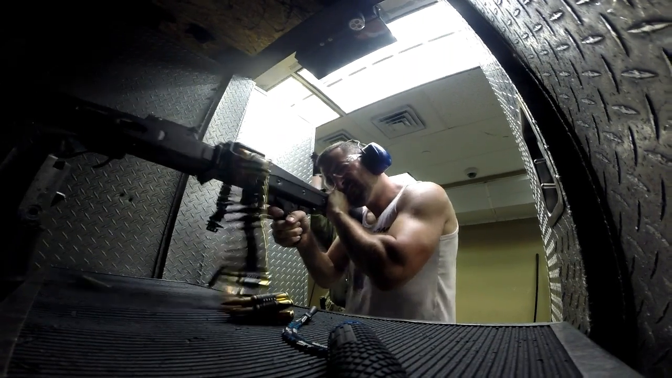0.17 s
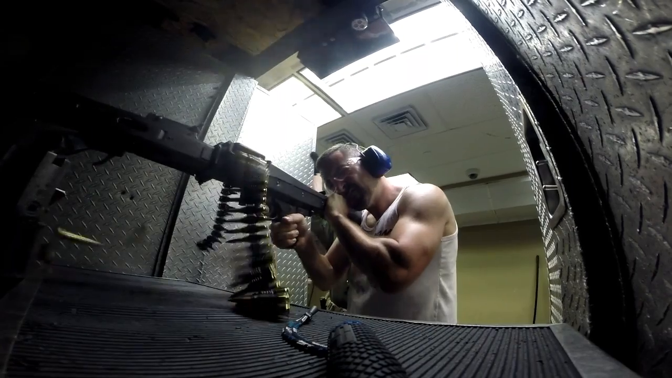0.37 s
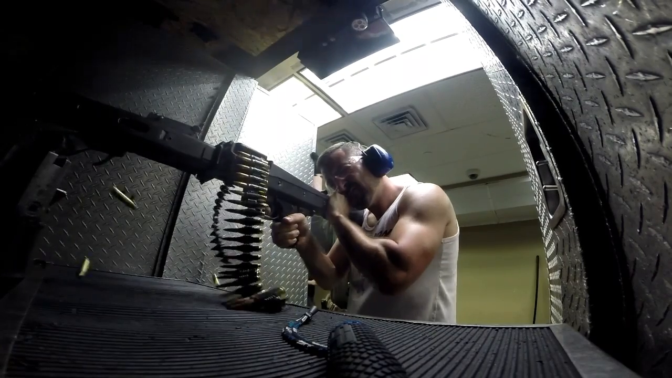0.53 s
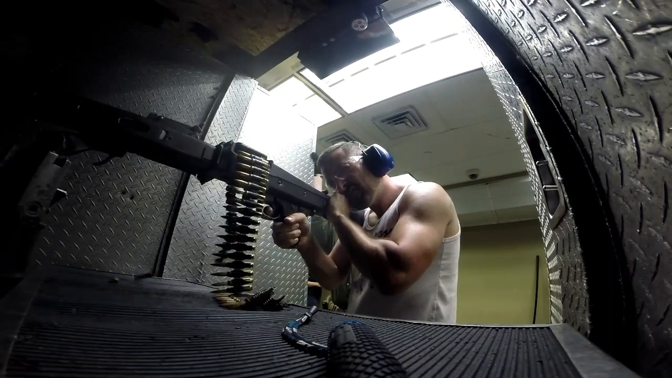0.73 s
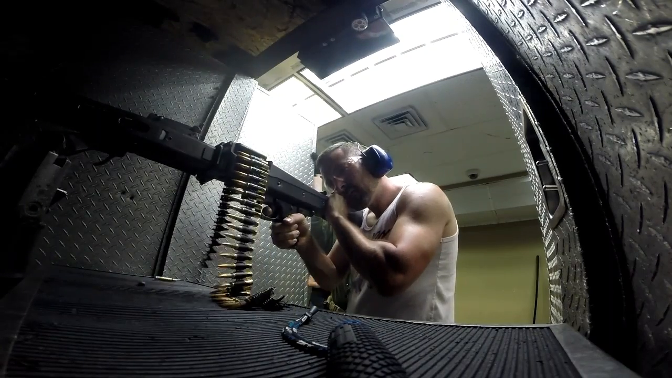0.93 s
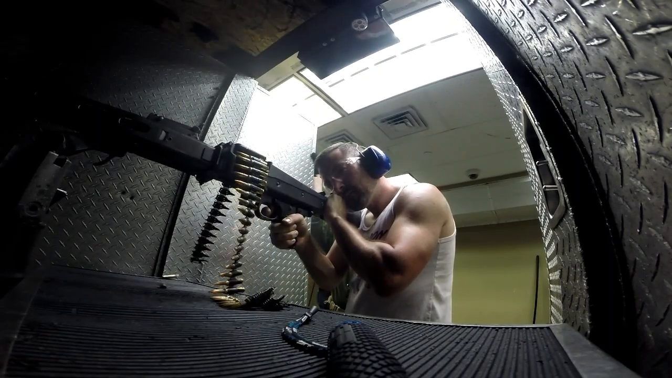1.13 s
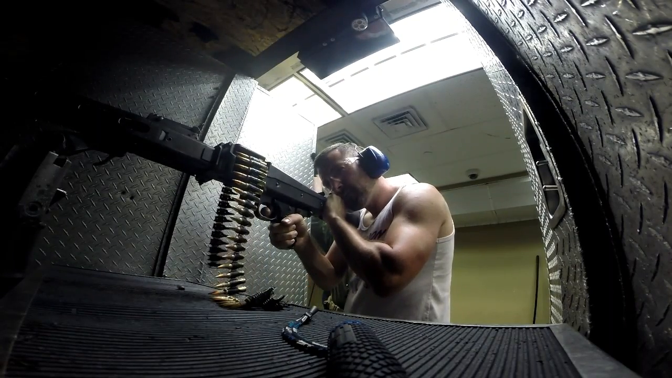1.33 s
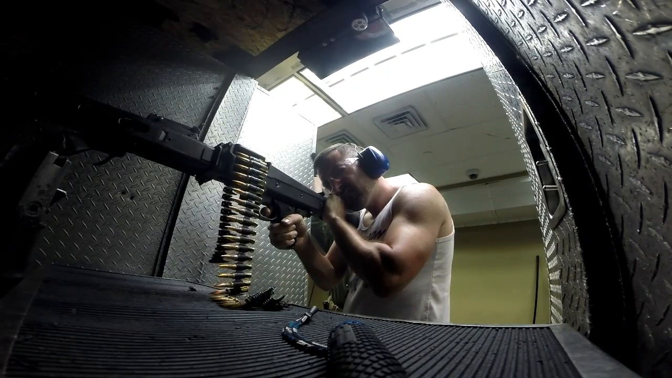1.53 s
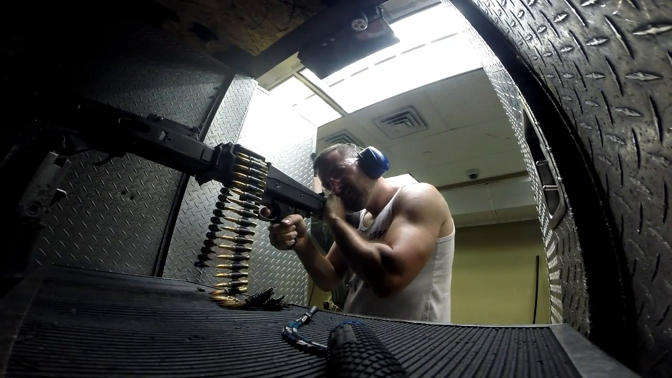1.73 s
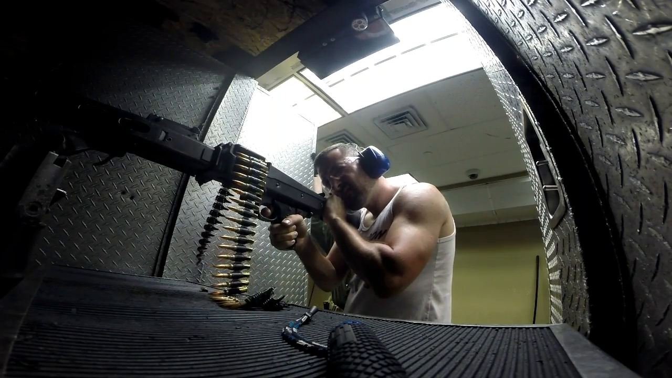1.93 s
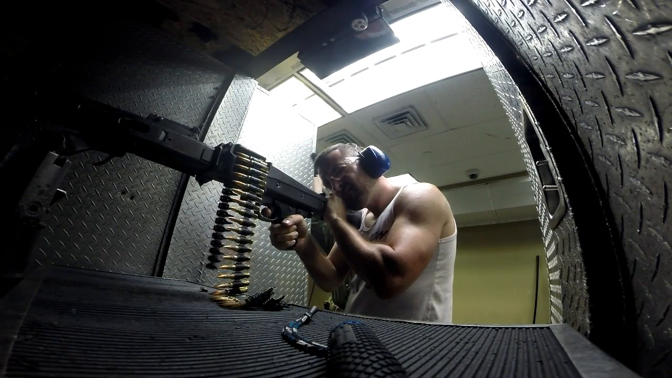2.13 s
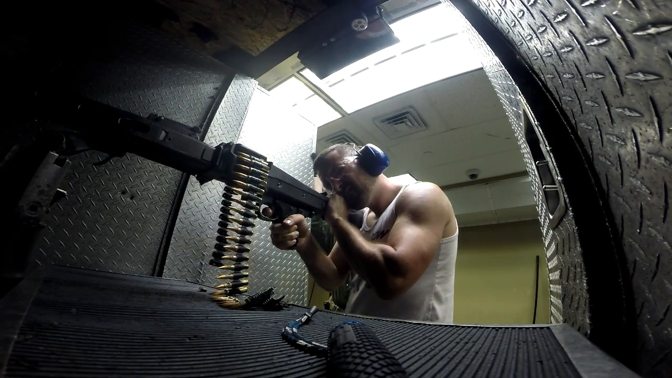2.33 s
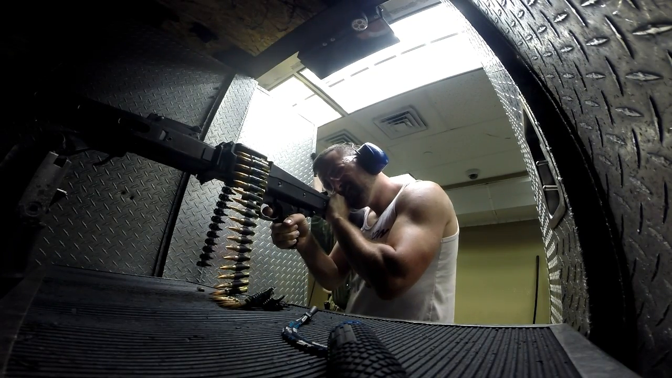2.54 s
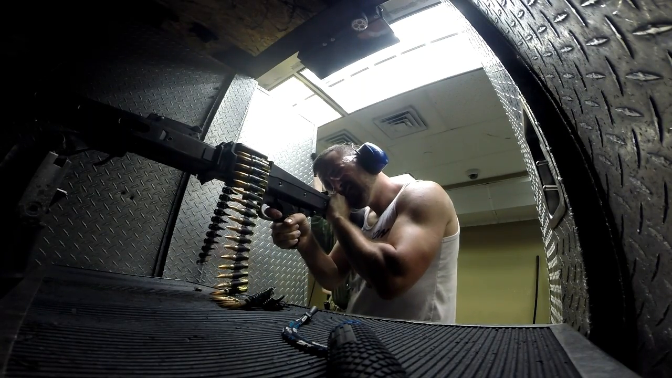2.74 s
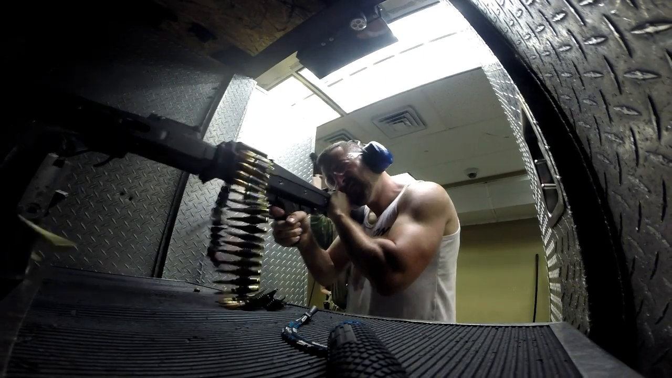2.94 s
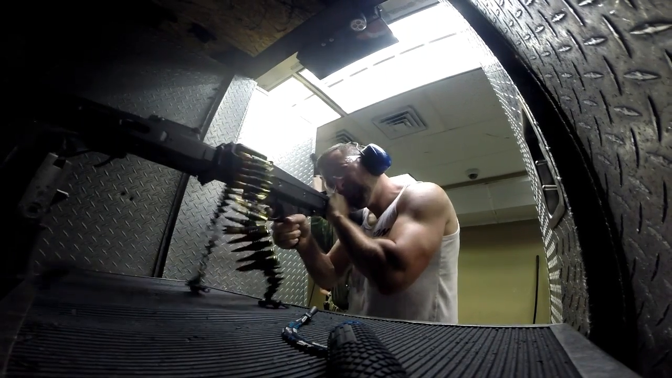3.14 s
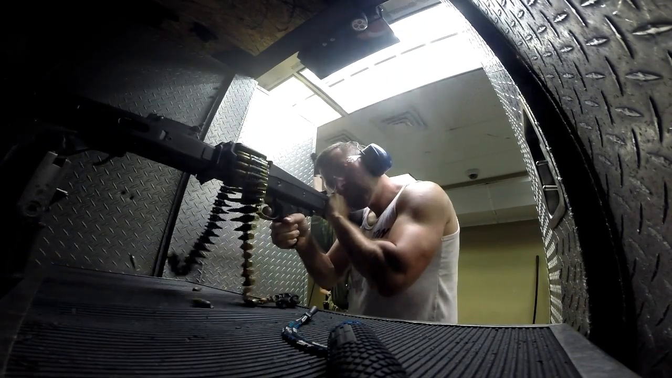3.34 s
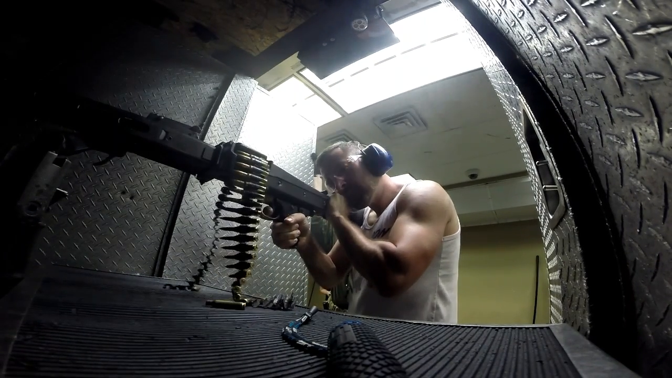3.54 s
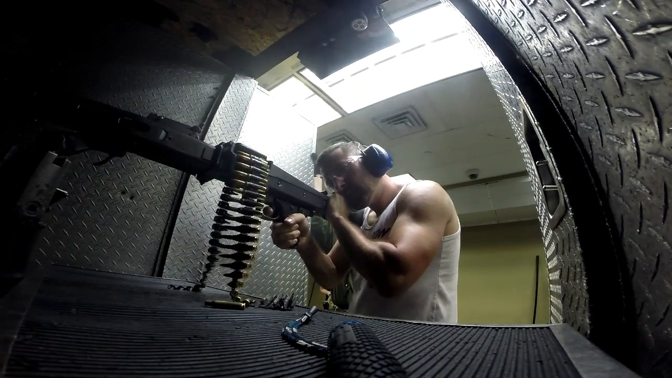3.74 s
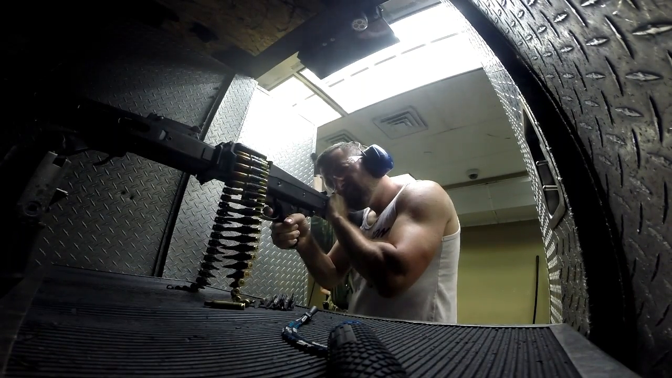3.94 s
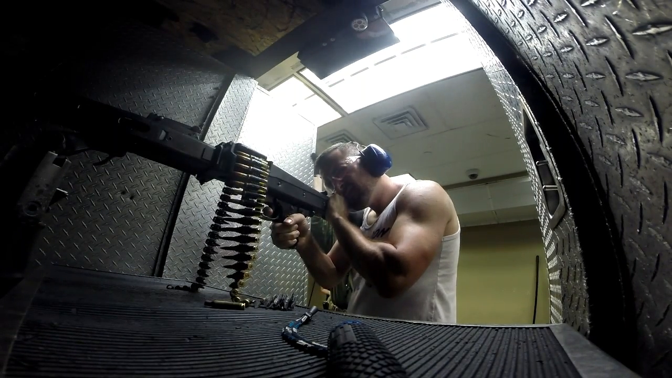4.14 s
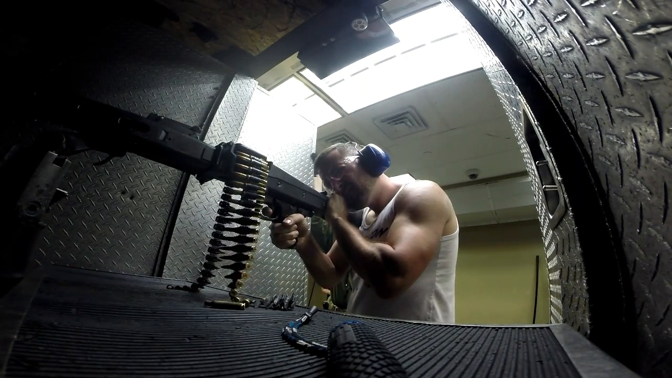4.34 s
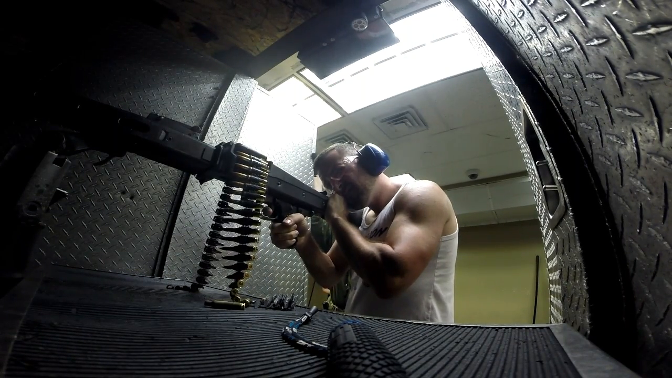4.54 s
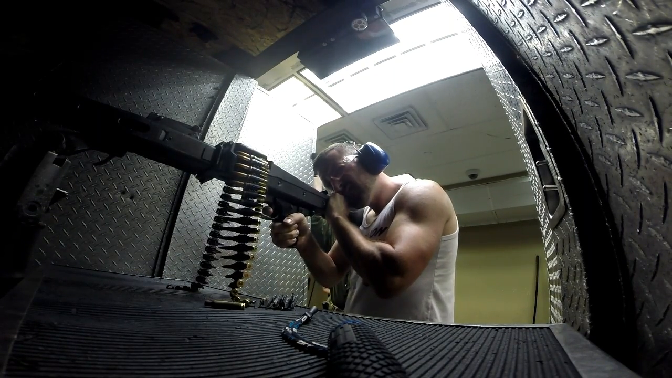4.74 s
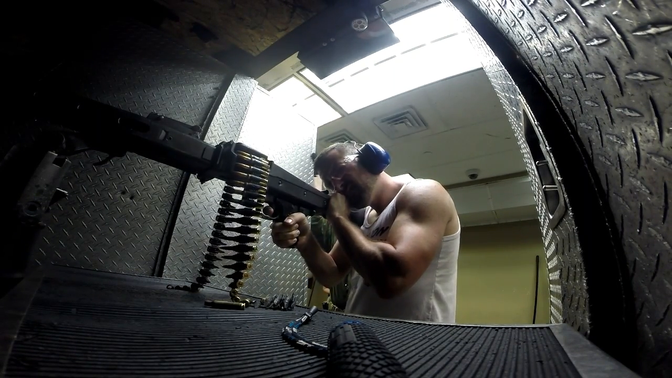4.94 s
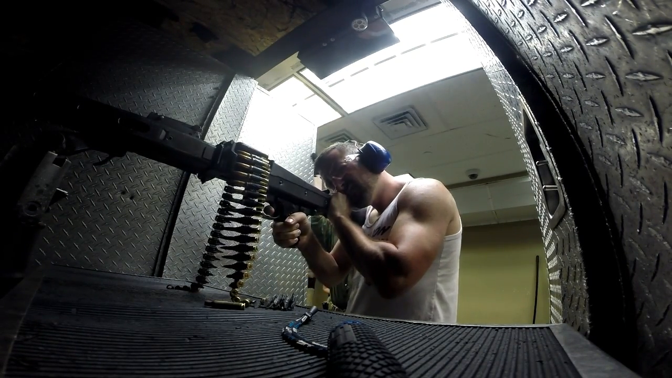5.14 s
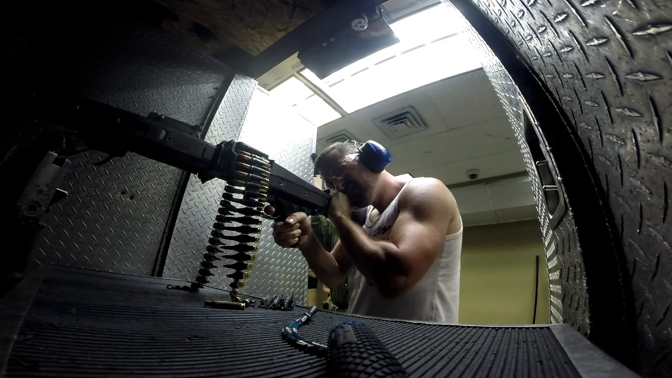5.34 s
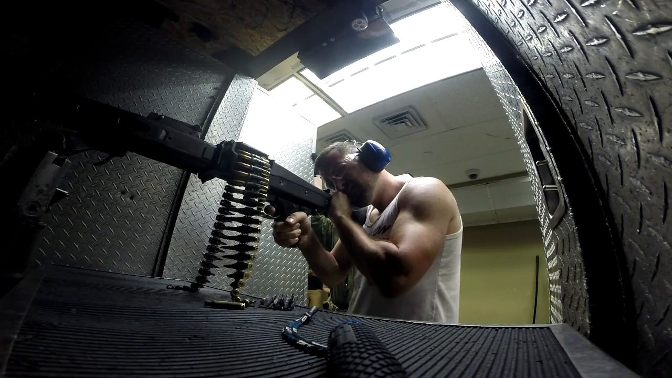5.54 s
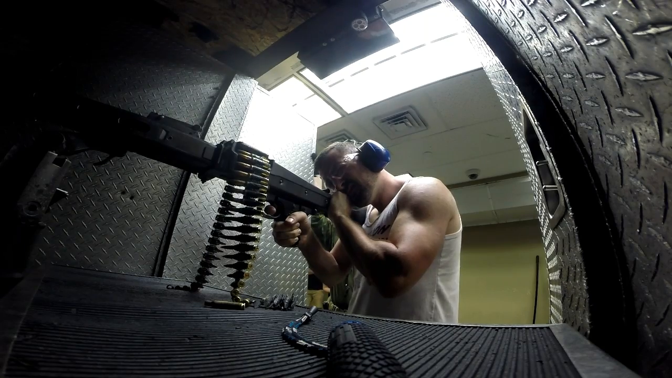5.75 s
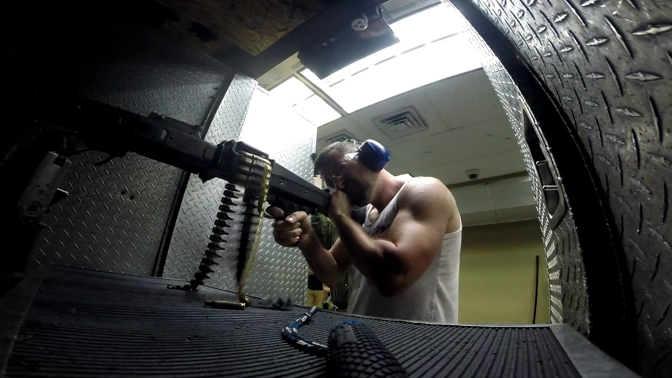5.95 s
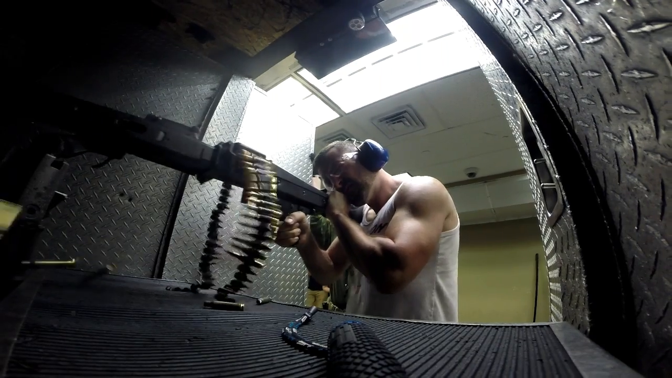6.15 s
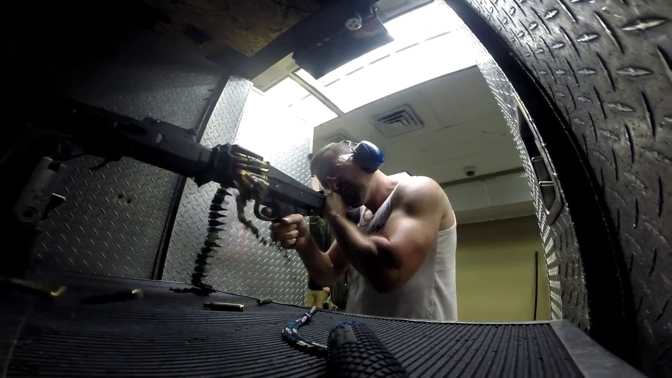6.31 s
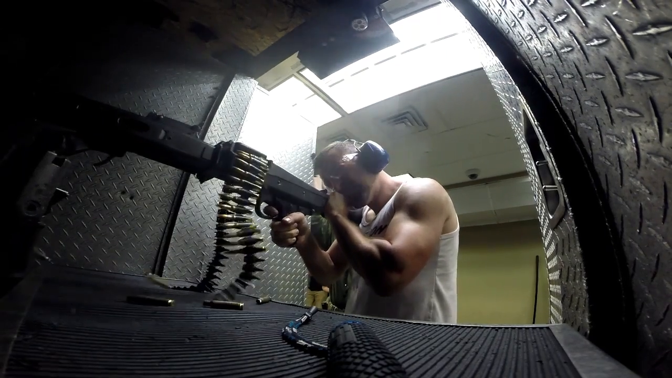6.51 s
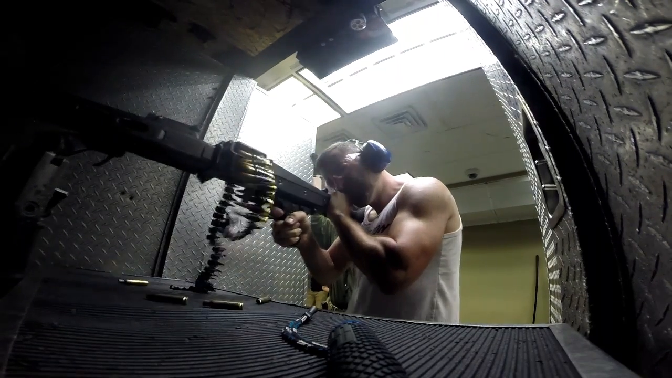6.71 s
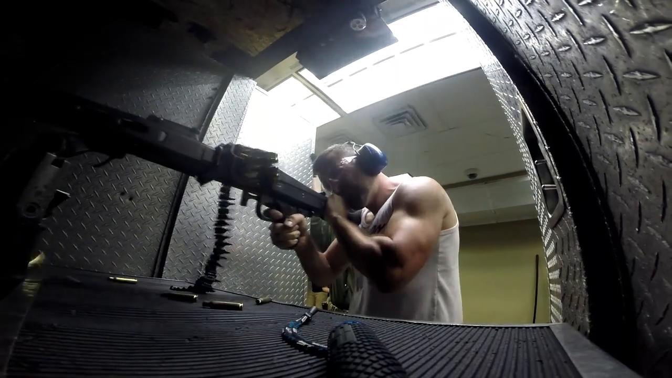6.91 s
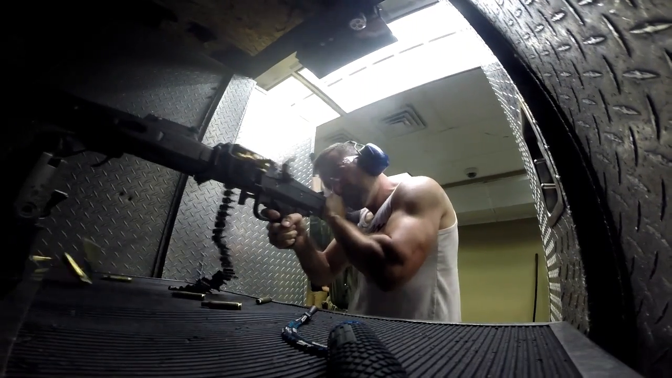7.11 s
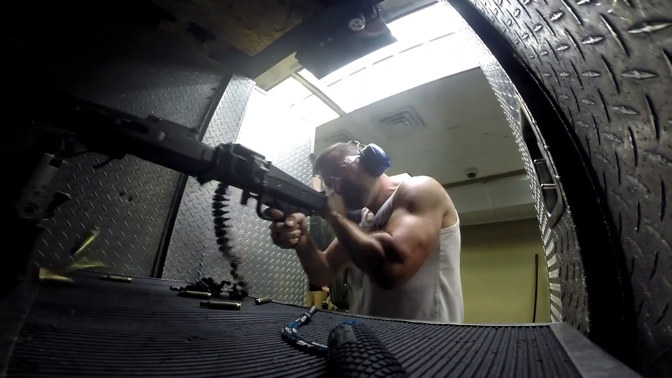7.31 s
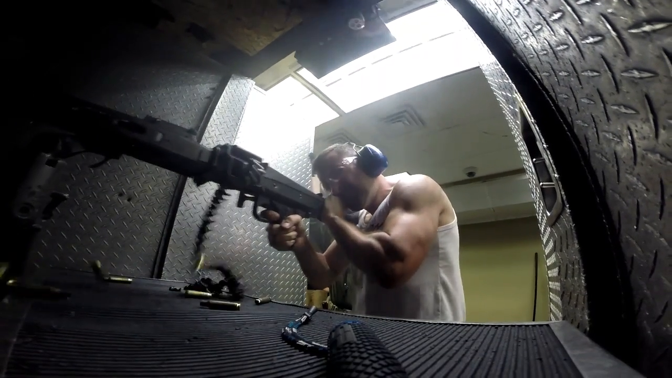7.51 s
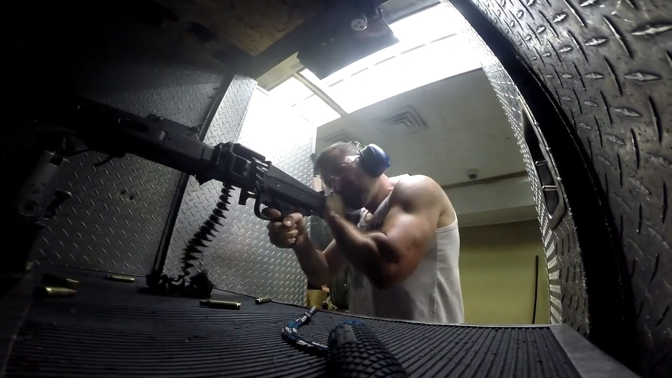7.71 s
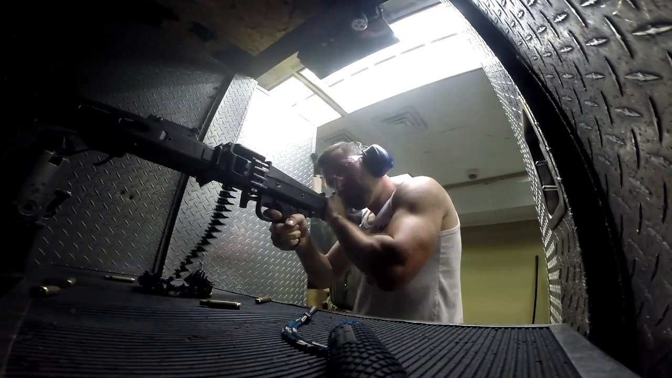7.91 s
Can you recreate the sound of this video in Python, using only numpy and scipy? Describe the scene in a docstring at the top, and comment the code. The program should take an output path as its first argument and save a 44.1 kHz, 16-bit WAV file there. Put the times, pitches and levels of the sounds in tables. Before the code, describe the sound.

A belt-fed machine gun fires three short, very rapid bursts and one longer one in a steel-lined indoor range, each ringing into a booming roar.

```python
"""Machine gun in an indoor range

A belt-fed gun fires four bursts, about 16 rounds a second, as spiky noise coloured by a steel-lined booth.
Decaying noise gives the hall's roar, boom and singing wall plates, and one shot reflected from another lane.
The belt clanks, the bolt slams, spent cases ring as decaying sines, and the bench shudders over ventilation,
a low thump and drones.
The camera's gain control ducks on overload and climbs back steadily, so the roar hangs on before it fades."""
import sys
import numpy as np
from scipy import signal
from scipy.fft import rfft, irfft, next_fast_len
from scipy.io import wavfile
from scipy.ndimage import uniform_filter1d, map_coordinates

SR = 44100
rng = np.random.default_rng(int(sys.argv[2]) if len(sys.argv) > 2 else 0)


def dump(signal):
    """Clip the signal to [-1, 1] and save it as 16-bit WAV at the path in sys.argv[1]."""
    limited = np.clip(np.atleast_2d(signal).T, -1, 1)
    pcm = np.round(limited * 32767).astype(np.int16)
    wavfile.write(sys.argv[1], SR, pcm)


N = 355887

# All levels in dB are relative: the layers' gains and the camera's gain control act on them later.
# Trigger pulls. Each row: first round in seconds, last round in seconds, number of rounds,
# first blast in dB, bolt run in dB, bench shudder in dB.
TRIGGER_PULLS = [(.129, 0.4286, 6, 5.5, -16.5, -25), (2.9222, 3.2231, 6, 1, -18.5, -31),
                 (6.0876, 6.3934, 6, 4, -23, -25), (6.732, 7.6501, 16, 1, -33, -37)]
# Paths by which the shot in another lane arrives. Each row: arrival in seconds, level in dB.
LANE_ARRIVALS = [(5.2318, -12.5), (5.2375, -8.5), (5.249, -30), (5.259, -11)]
# Hard metal strikes: the belt on gun and bench, and two loud bolt slams (at 3.191 and 6.881 seconds).
# Each row: start in seconds, level in dB.
METAL_STRIKES = [(.562, -3.5), (.671, -7), (.75, -23), (.852, -20.5), (1.222, -15), (1.356, -27),
                 (1.443, -27.5), (1.63, -34.5), (2.099, -37.5), (3.191, -3), (3.29, -4), (3.763, -24.5),
                 (3.805, -27), (4.275, -38.5), (6.881, -7), (7.888, -11.5), (7.927, -8.5)]
# Jingles of the swinging belt. Each row: start in seconds, length in seconds, level of a clink in dB.
BELT_JINGLES = [(0.793, .32, -41.5), (1.236, .27, -31), (3.648, .24, -38.5), (7.901, .08, -26.5)]
# Falls of spent cases. Each row: first contact in seconds, level in dB, number of contacts,
# first flight in seconds, pitch that rings most in Hz.
CASE_FALLS = [(0, -49, 1, 0, 8800), (1.61, -39.5, 4, 0.11, 10500), (2.015, -45.5, 1, 0.0053, 9800),
              (2.097, -34, 1, 0, 10500), (2.34, -48.5, 1, 0.025, 10500), (2.497, -45, 1, 0, 10000),
              (2.533, -35, 1, 0, 10000), (2.733, -43.5, 1, 0, 9000), (4.087, -44.5, 2, 0.056, 11500),
              (4.219, -33, 1, 0, 13400), (4.324, -38, 2, .064, 10900), (4.566, -41, 1, 0, 11900),
              (4.622, -37.5, 1, 0.013, 13000), (4.83, -46.5, 1, 0, 6900), (4.936, -47.5, 3, .05, 9100)]
# Low thump (at 1.84 seconds) and drones that swell and sink.
# Each row: peak in seconds, swell time in seconds, pitch in Hz, level in dB.
THUMP_AND_DRONES = [(1.84, .08, 110.3, -34.5), (2.14, 0.084, 201, -49.5), (5.63, .1, 95, -43),
                    (5.87, .2, 221, -45.5)]

# Ring of a brass case. Each row: frequency in Hz, level in dB.
BRASS_MODES = [(6196, -5), (8150, -15.5), (8823, 2.5), (9087, -16), (10950, -8), (11170, -10),
               (11531, -16.5), (11780, -5.5), (12161, -4), (12715, -13), (13900, -7), (14170, 3),
               (15057, -1)]
# Long-ringing steel wall plates. Each row: frequency in Hz, width in Hz, level in dB.
WALL_PLATES = [(543.4, 18, -5), (722.6, 62, -3.5), (1017, 34, -12.5), (1300, 90, -1), (2330, 790, -17)]
# Air and panel resonances of the booth. Each row: frequency in Hz, width in Hz, lift in dB.
BOOTH_RESONANCES = [(413, 180, 9.5), (641, 44, 12.5), (794, 61, 16), (950, 100, 13), (1180, 140, 7.5),
                    (1230, 160, 4), (1580, 51, 5.5), (2407, 93, 5.5), (3140, 170, 8), (4100, 180, 2.5),
                    (5240, 180, 4.5)]
# Ring of the belt's links and the feed tray. Each row: frequency in Hz, width in Hz, lift in dB.
LINK_RESONANCES = [(1513, 94, 8.5), (2440, 91, 5), (2870, 66, 2.5), (4100, 170, 10), (4760, 100, 9),
                   (5100, 110, 2), (5240, 60, 5.5)]

# Spectra of the sources and of their echoes. Each row: frequency in Hz, density in dB per Hz.
# Muzzle blast, and its flutter between the booth's walls:
BLAST_SPECTRUM = [(25, -6), (120, -12.5), (420, -16), (600, -16), (880, -17), (1200, -8), (1500, -11.5),
                  (2200, -10), (3500, -22.5), (5200, -20.5), (8000, -31.5), (15500, -40.5)]
FLUTTER_SPECTRUM = [(60, -28), (620, -17), (850, -18), (1270, -5), (1450, -15), (2400, -9), (3550, -22.5),
                    (4300, -17), (5400, -23.5), (8000, -30), (15500, -38.5)]
# Early echoes, late roar and low boom of the hall, and the shot in another lane:
EARLY_SPECTRUM = [(30, -29.5), (100, -5), (450, 0.5), (800, -4), (1250, -6.5), (1600, -12), (2500, -10),
                  (3500, -21), (5200, -22), (8000, -32.5), (15500, -46)]
ROAR_SPECTRUM = [(30, -8), (100, 5.5), (250, -1), (550, 0), (900, -10), (1250, 0.5), (1600, -10.5),
                 (2500, -13.5), (3500, -21.5), (5200, -25.5), (8000, -38), (15500, -35)]
BOOM_SPECTRUM = [(25, -19.5), (50, 4), (105, 18.5), (140, -19.5), (190, -0.5), (280, -21), (1000, -55),
                 (4000, -100)]
LANE_SPECTRUM = [(30, -29), (90, -3.5), (150, -15), (400, -8.5), (700, -8), (950, -3.5), (1300, -2),
                 (1750, -17.5), (2600, -14), (3500, -22.5), (5200, -24.5), (8000, -38), (15500, -40)]
# Struck steel, sliding and slamming bolt, and the tick of a case on the floor:
STEEL_SPECTRUM = [(60, -47), (400, -12), (800, 3.5), (1150, 1.5), (1650, 3), (2050, 1), (2650, 2.5),
                  (3450, -21.5), (4200, -5), (5100, -10.5), (6200, -18.5), (9000, -22), (15500, -25)]
BOLT_SPECTRUM = [(100, 3), (450, -24), (900, -3), (1700, -8.5), (2600, 1.5), (3400, -7.5), (4500, -4.5),
                 (6000, -5.5), (8500, -18), (15500, -20.5)]
TICK_SPECTRUM = [(300, -34.5), (1500, -0.5), (5000, -5), (7000, -7.5), (10000, -12.5), (15500, -20)]
# Shuddering bench, and ventilation:
BENCH_SPECTRUM = [(20, -16), (50, 0), (85, 0.5), (135, -5.5), (185, -4.5), (270, -28), (1000, -33.5),
                  (4000, -72)]
VENT_SPECTRUM = [(25, -6.5), (50, -3), (85, 5), (135, -20), (185, -11), (260, -15.5), (900, -22),
                 (1280, -19), (1700, -24.5), (2500, -22), (3600, -34), (5500, -34.5), (9000, -46.5),
                 (15500, -42)]

# the released bolt runs forward for this long before the first round
BOLT_RUN_S = .049
# the first cycle of a burst is this much shorter than the rest
FIRST_CYCLE_SHORT_S = .0025
# full blast, its scatter, and the share of the gap to full blast that is left one round later
ROUND_DB, ROUND_SCATTER_DB, SETTLE = 3.5, 0.58, 0.52
# the bench's shudder builds up until this long after the last round, then dies away, swaying all the while
SHUDDER_LAG_S, SHUDDER_RISE_DB_PER_S, SHUDDER_FALL_DB_PER_S = 0.37, 28.5, 16
SWAY_S, SWAY_DB = 0.32, 2
CLINKS_PER_S, CLINK_SCATTER_DB = 86, 2
# each flight over the one before, loss at each bounce, fall of the ring away from its strongest pitch
BOUNCE_SHRINK, BOUNCE_LOSS_DB, RING_FALL_DB_PER_OCTAVE = .69, 3, 17
LOW_BAND_WIDTH_HZ = 13  # of the thump and drones
TOP_HZ = 15900  # the camera's band limit


def amp(db):
    """Decibel law: level in dB to amplitude."""
    return 10 ** (np.asarray(db) / 20)


def unit(x):
    """Normalisation to an rms of 1."""
    return x / np.sqrt(np.mean(x ** 2) + 1e-20)


def clock(seconds):
    """Uniform sampling: the times in seconds over a given length."""
    return np.arange(int(seconds * SR)) / SR


def fade(t, t60):
    """Exponential decay: falls 60 dB in t60 seconds."""
    return np.exp(-np.log(1000) * t / t60)


def add(track, s, sound):
    """Superposition: mixes a sound in at s seconds."""
    part = track[max(round(s * SR), 0):][:len(sound)]
    part += sound[:len(part)]


def colour(x, points, modes=(), size=4096):
    """Minimum-phase filtering: a causal filter of unit energy with a given spectrum and resonances."""
    hz, db = np.transpose(points)
    grid = np.fft.rfftfreq(size, 1 / SR)
    lifts = sum(lift / (1 + (2 * (grid - centre) / width) ** 2) for centre, width, lift in modes)
    gain = amp(np.interp(np.log(grid + 1), np.log(hz), db) + lifts)
    # folding the cepstrum onto positive times makes the response causal
    cepstrum = irfft(np.log(gain))
    fold = 1 + np.sign(size // 2 - np.arange(size))
    fold[0] = 1
    response = irfft(np.exp(rfft(cepstrum * fold)))
    return signal.oaconvolve(x, response / np.linalg.norm(response))[:N]


def noise(points, modes=()):
    """Stationary noise: white noise filtered to a given spectrum."""
    return colour(rng.standard_normal(N), points, modes)


def singing(peaks):
    """Narrow-band resonance: random phases under resonance peaks (Hz, width Hz, dB), rms 1."""
    hz = np.fft.rfftfreq(next_fast_len(N), 1 / SR)
    gain = sum(amp(db) / (1 + (2 * (hz - centre) / width) ** 2) for centre, width, db in peaks)
    phases = np.exp(2j * np.pi * rng.random(len(hz)))
    return unit(irfft(gain * phases)[:N])


def burst(shape):
    """Impulsive noise: a dense cluster of pressure spikes under an envelope, nearly even in spectrum."""
    shaped = shape * rng.standard_normal(len(shape))
    flat = irfft(np.exp(1j * np.angle(rfft(shaped))), len(shape))
    spikes = flat * np.sqrt(shape)
    return spikes * np.linalg.norm(shape) / np.linalg.norm(spikes)


def dying(events, t60, rise):
    """Energy balance of a diffuse field: each event adds energy, which builds up and leaks away."""
    energy = np.zeros(N)
    for s, db in events:
        add(energy, s, amp([db]) ** 2)
    leak = fade(1 / SR, t60) ** 2
    build = np.exp(-1 / (SR * rise))
    stored = signal.lfilter([1], [1, -leak], energy)
    return np.sqrt(signal.lfilter([1 - build], [1, -build], stored))


def volley(rounds, shape, alike):
    """Partial coherence: the walls stay put, so a share of each round's burst repeats."""
    out, same = np.zeros(N), burst(shape)
    for s, db in rounds:
        fresh = burst(shape)
        add(out, s, amp(db) * (np.sqrt(alike) * same + np.sqrt(1 - alike) * fresh))
    return out


def scraping(strokes, swell_db, rough_db, rate):
    """Stick-slip friction: the envelope of sliding steel, catching many times a second."""
    out = np.zeros(N)
    for s, length, db in strokes:
        still_to_go = 1 - clock(length) / length
        add(out, s, amp(db - swell_db * still_to_go))
    knots = rng.standard_normal(int(N * rate / SR) + 4)
    catches = map_coordinates(knots, [np.arange(N) * rate / SR], order=1)
    return out * amp(rough_db * catches)


def shudder():
    """Forced and free vibration: each burst shakes the bench up, then it sways to rest."""
    t, energy = np.arange(N) / SR, np.zeros(N)
    for first, last, _, _, _, db in TRIGGER_PULLS:
        since = t - last - SHUDDER_LAG_S
        slope_db = np.minimum(SHUDDER_RISE_DB_PER_S * since, -SHUDDER_FALL_DB_PER_S * since)
        sway_db = SWAY_DB * np.cos(2 * np.pi * since / SWAY_S)
        energy += (t > first) * amp(db + slope_db + sway_db) ** 2
    return np.sqrt(energy)


def rumble():
    """Low-frequency noise: shuddering bench, steady ventilation, and a thump and drones in narrow bands."""
    t, swells = np.arange(N) / SR, np.zeros(N)
    for s, swell, hz, db in THUMP_AND_DRONES:
        envelope = np.exp(-((t - s) / swell) ** 2)
        swells += amp(db) * envelope * singing([(hz, LOW_BAND_WIDTH_HZ, 0)])
    return shudder() * noise(BENCH_SPECTRUM) + amp(-46.0) * noise(VENT_SPECTRUM) + swells


def landings():
    """Inelastic bouncing: every contact of a case (s, dB, Hz), its flights shorter and hits weaker."""
    out = []
    for s, db, contacts, flight, ring_hz in CASE_FALLS:
        for k in range(contacts):
            flown = flight * np.sum(BOUNCE_SHRINK ** np.arange(k))
            out.append((s + flown, db - BOUNCE_LOSS_DB * k, ring_hz))
    return out


def cases():
    """Modal vibration: each landing ticks and rings the brass; the case spins, so its ring flutters."""
    out, t = np.zeros(N), clock(.6)
    hz, mode_db = np.transpose(BRASS_MODES)
    for s, db, ring_hz in landings():
        size, detune, spin, angle = rng.standard_normal((4, len(hz)))
        # spin rates scatter by 9 Hz, pitches by 0.3 percent, mode levels by 4.5 dB
        tumble = np.cos(2 * np.pi * np.outer(9 * spin, t) + np.pi * angle[:, None])
        ring = np.sin(2 * np.pi * np.outer(hz * (1 + .003 * detune), t)) * tumble
        struck_db = mode_db - RING_FALL_DB_PER_OCTAVE * np.abs(np.log2(hz / ring_hz))
        add(out, s, amp(db + struck_db + 4.5 * size) @ ring * fade(t, .55))
    hits = [(s, db) for s, db, _ in landings()]
    ticks = dying(hits, t60=0.057, rise=0.00032) + amp(-5) * dying(hits, t60=0.32, rise=0.0046)
    return amp(-15.5) * out + amp(-7.5) * ticks * noise(TICK_SPECTRUM)


def struck_steel():
    """Impact excitation: belt clanks, belt jingles and two bolt slams, each leaving a faint room tail."""
    hits = list(METAL_STRIKES)
    for s, length, db in BELT_JINGLES:
        chance = rng.standard_normal((round(length * CLINKS_PER_S), 2))
        for k, (late, hard) in enumerate(chance):
            hits.append((s + (k + late / 2) / CLINKS_PER_S, db + CLINK_SCATTER_DB * hard))
    strikes = dying(hits, t60=0.057, rise=0.00057) + amp(-33.0) * dying(hits, t60=1.0, rise=0.009)
    return strikes * noise(STEEL_SPECTRUM, LINK_RESONANCES)


def neighbour():
    """Reflection without direct sound: a shot behind the partition arrives only by its echoes."""
    reflections = dying(LANE_ARRIVALS, t60=0.12, rise=0.00046)
    tail = amp(-8.5) * dying(LANE_ARRIVALS, t60=0.67, rise=0.013)
    return (reflections + tail) * noise(LANE_SPECTRUM)


def hall(rounds):
    """Reverberation: the range answers with a long roar, a longer boom and singing wall plates."""
    roar = amp(-18) * dying(rounds, t60=1.39, rise=0.015) * noise(ROAR_SPECTRUM)
    boom = amp(-31.5) * dying(rounds, t60=1.7, rise=0.012) * noise(BOOM_SPECTRUM)
    plates = amp(-32.5) * dying(rounds, t60=2.68, rise=0.017) * singing(WALL_PLATES)
    return roar + boom + plates


def near_walls(rounds):
    """Early reflection: the first, quickly dying echoes from around the firing line."""
    return amp(-9.5) * dying(rounds, t60=0.33, rise=0.042) * noise(EARLY_SPECTRUM)


def action(rounds):
    """Friction and impact: the bolt scrapes forward before a burst and slams back after every round."""
    strokes = [(s - BOLT_RUN_S, BOLT_RUN_S, db) for s, _, _, _, db, _ in TRIGGER_PULLS]
    run = scraping(strokes, swell_db=12, rough_db=4, rate=300)
    # the bolt meets its buffer about 26 ms after the round
    slams = []
    for (s, _), (late, hard) in zip(rounds, rng.standard_normal((len(rounds), 2))):
        slams.append((s + .026 + .0025 * late, 3.5 * hard))
    clacks = amp(-7) * dying(slams, t60=.03, rise=.0007)
    return run * noise(BOLT_SPECTRUM) + clacks * noise(BOLT_SPECTRUM, LINK_RESONANCES)


def shots():
    """Approach to a steady state: every round (s, dB), the blast soon settling to its full level."""
    out = []
    for first, last, count, first_db, _, _ in TRIGGER_PULLS:
        times = np.linspace(first - FIRST_CYCLE_SHORT_S, last, count)
        times[0] = first
        blast_db = ROUND_DB + (first_db - ROUND_DB) * SETTLE ** np.arange(count)
        out += zip(times, blast_db + ROUND_SCATTER_DB * rng.standard_normal(count))
    return out


def gun(rounds):
    """Blast and flutter echo: muzzle blasts a few ms long, then their flutter between the booth's walls."""
    t = clock(.15)
    blast = volley(rounds, 1 / (1 + (t / .0055) ** 3), alike=.7)
    flutter_shape = fade(t, 0.093) * (1 - np.exp(-(t / 0.0091) ** 2))
    flutter = volley(rounds, flutter_shape, alike=0.48)
    direct = amp(6.0) * colour(blast, BLAST_SPECTRUM, BOOTH_RESONANCES)
    return direct + amp(7.5) * colour(flutter, FLUTTER_SPECTRUM, BOOTH_RESONANCES)


def scene():
    """Superposition of the low background, struck metal, the other lane, and the gun with its echoes."""
    rounds = shots()
    lane_shot = (LANE_ARRIVALS[1][0], -5)
    firing = gun(rounds) + action(rounds) + near_walls(rounds)
    echoes = neighbour() + hall(rounds + [lane_shot])
    return (firing + echoes + struck_steel() + cases() + rumble())[None]


def gain_control(x, threshold_db, depth_db, recovery_db_per_s, lag):
    """Compression: an overload pulls the gain down a few ms late; it climbs back at a steady rate."""
    level_db = 10 * np.log10(np.abs(uniform_filter1d(x ** 2, size=130)) + 1e-12)
    wanted = np.clip(4 * (level_db - threshold_db), 0, depth_db)
    t = np.arange(N) / SR
    # hold the deepest cut so far, less what has been recovered since
    cut = np.maximum.accumulate(wanted + recovery_db_per_s * t) - recovery_db_per_s * t
    return x * amp(-np.interp(t - lag, t, uniform_filter1d(cut, size=130)))


def record(dry):
    """Nonlinear transduction: microphone saturation, gain control, clipping, soft treble, band limit."""
    headroom = amp(16)
    x = headroom * np.tanh(dry[0] / headroom)
    x = gain_control(x, threshold_db=1.5, depth_db=20.5, recovery_db_per_s=71.0, lag=0.0059)
    x = x / (1 + x ** 6) ** (1 / 6)  # clipping with a slightly rounded knee
    x = signal.lfilter(*signal.butter(1, 8000, fs=SR), x)
    return signal.fftconvolve(x, signal.firwin(401, TOP_HZ, fs=SR), "same")[None]


dry = scene()
out = record(dry)
dump(out)
```